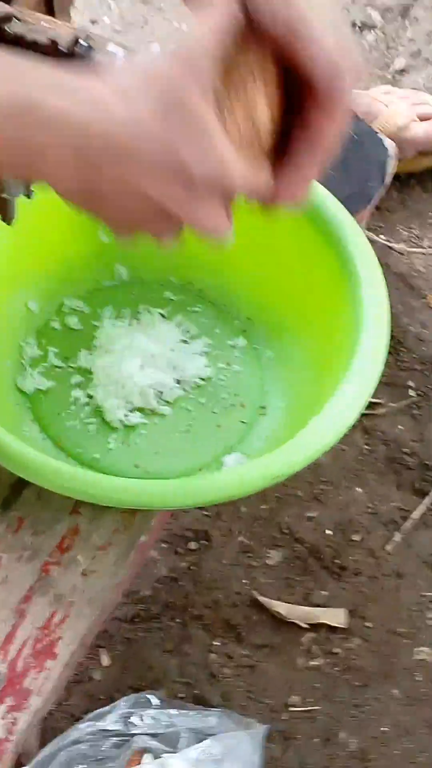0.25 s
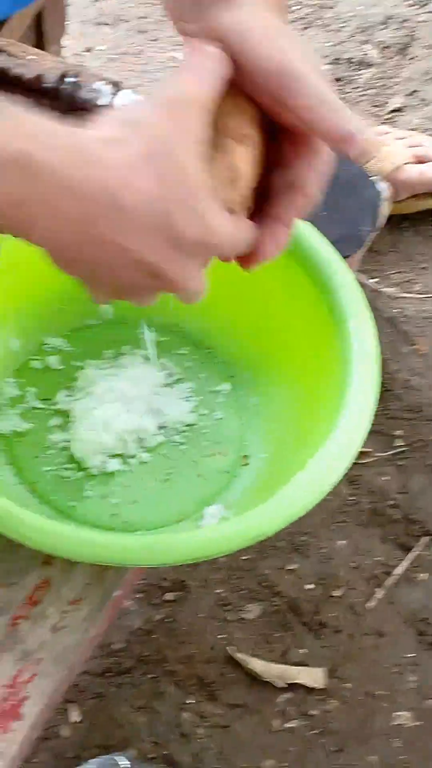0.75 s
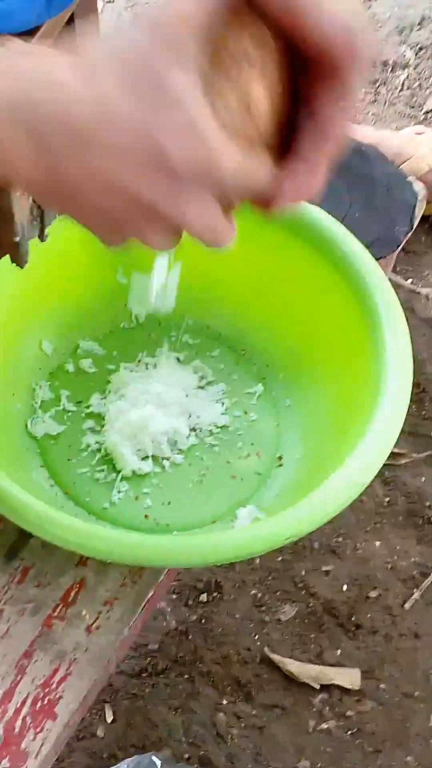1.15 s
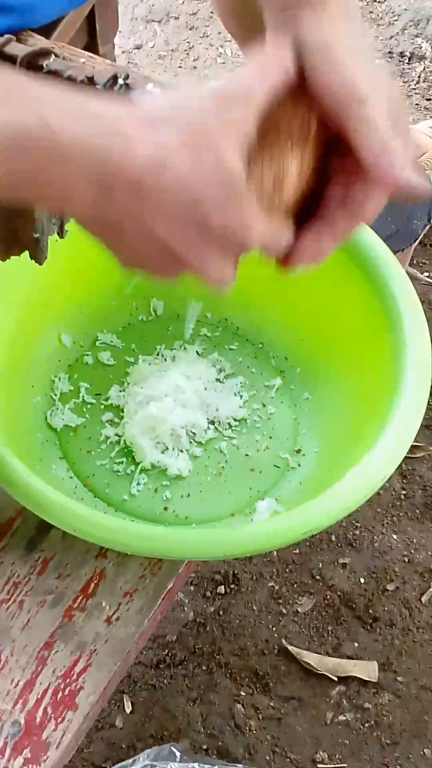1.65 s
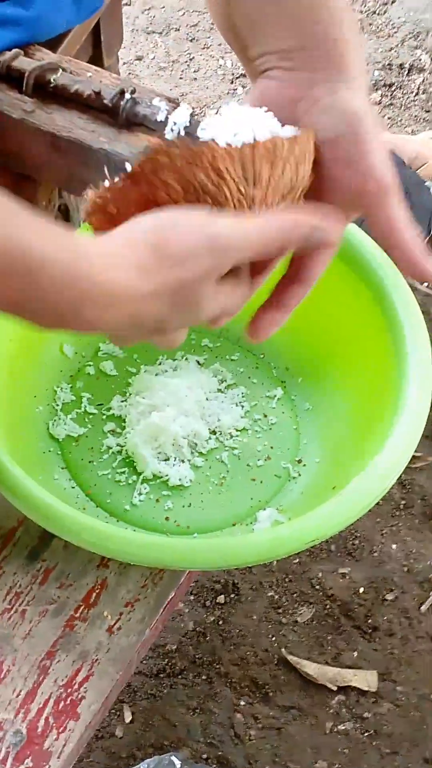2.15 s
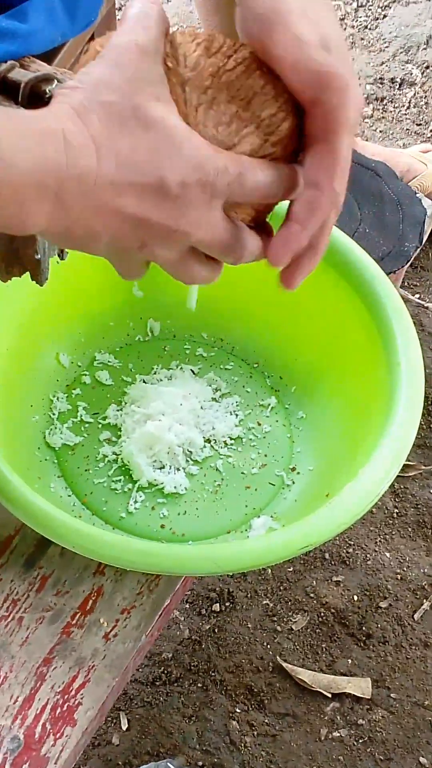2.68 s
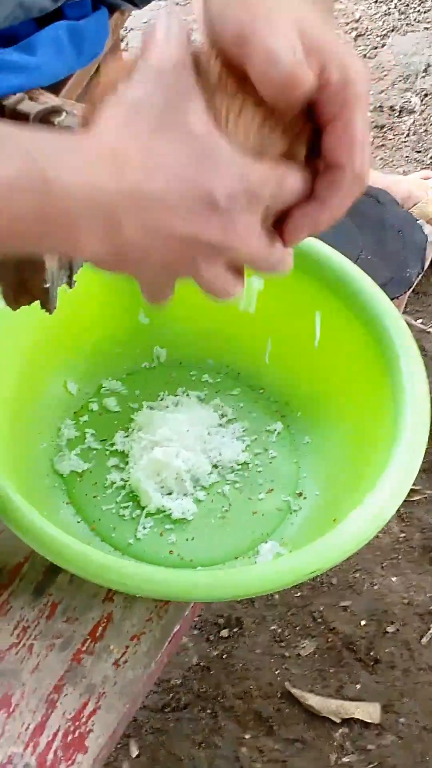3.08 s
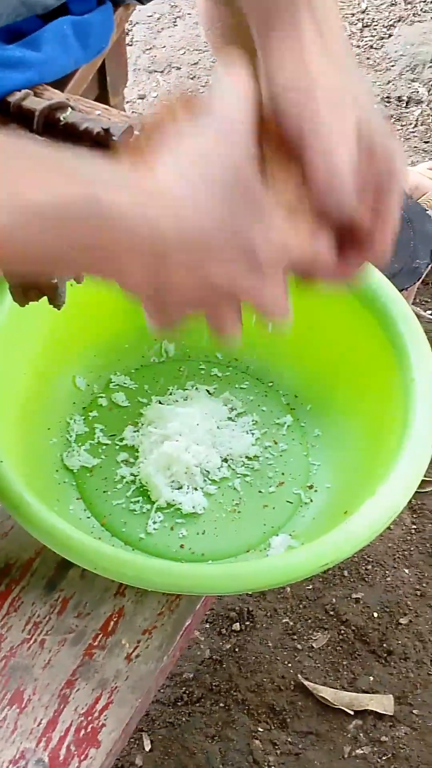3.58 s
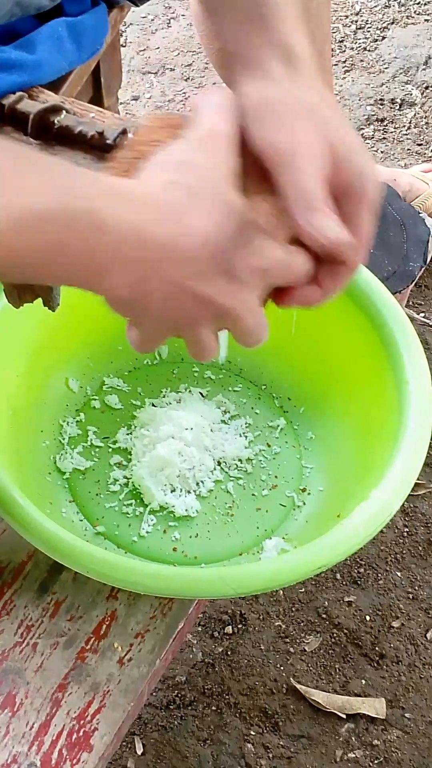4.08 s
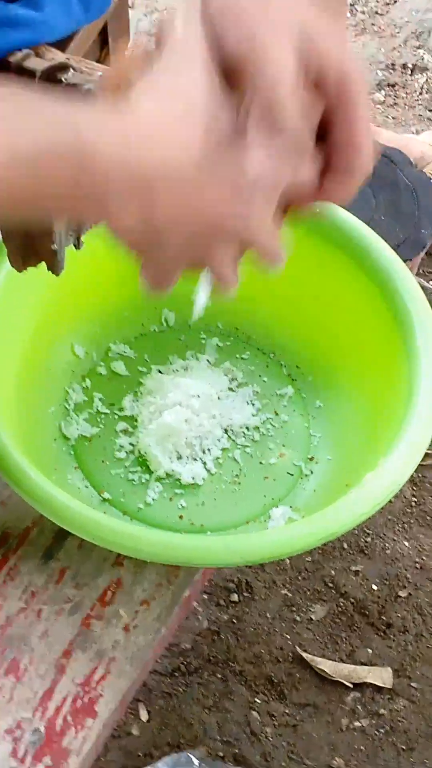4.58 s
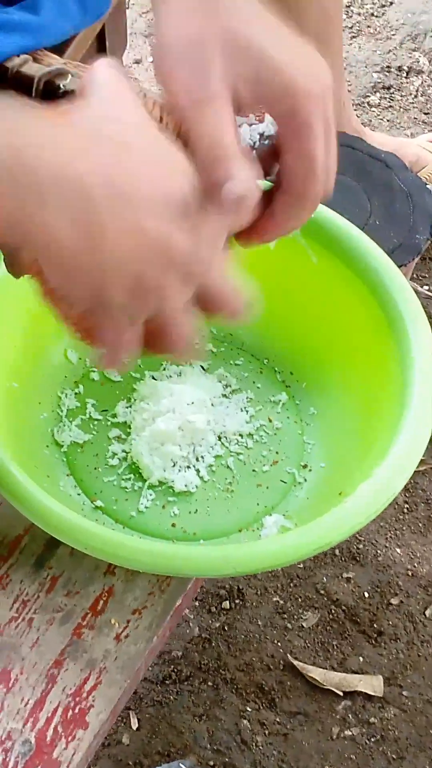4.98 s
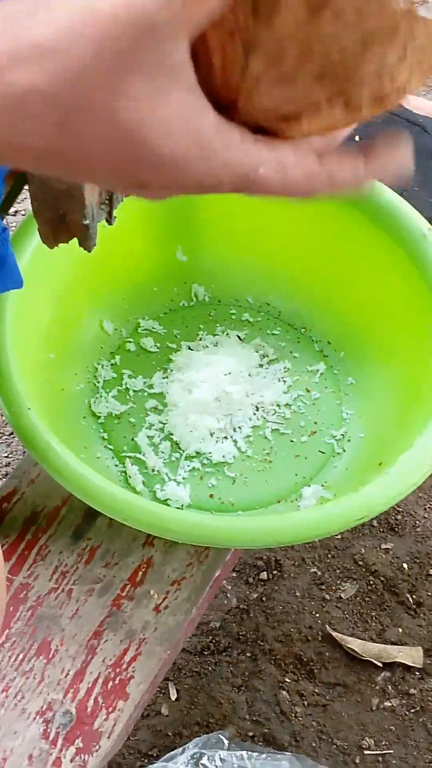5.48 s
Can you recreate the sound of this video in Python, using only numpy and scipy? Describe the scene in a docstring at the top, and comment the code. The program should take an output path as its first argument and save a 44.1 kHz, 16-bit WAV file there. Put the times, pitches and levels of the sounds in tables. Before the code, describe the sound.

From the start, half a coconut is grated by hand over a toothed steel blade, close by, at about three strokes a second. Each short pull is a gritty, tearing rasp with a hollow judder and knock of the shell and a soft thud from the wooden bench. Light crunches fall between strokes. The rim clacks lightly at 0.7 and 2.1 seconds, and small cracks come near 1.8, 2.4 and 5.2 seconds. Around 3 seconds the grating pauses, leaving a few faint ticks and one weak scrape. It resumes at 3.7 seconds, slightly less even, and runs until about 5.7 seconds, with a brief metallic ping at 5.5. Underneath are a faint rub of skin on husk and low, steady outdoor noise. Very faint, thin distant calls, perhaps poultry, come near 2.3, 3 and 4.4 seconds. The yard adds only a slight, short echo.

```python
"""Half a coconut is rasped by hand over a toothed blade in a quiet yard, about three strokes a second.
Over faint noise and rubbing, each pull tears fibres, judders the hollow shell and thuds the bench.
The teeth touch the meat between pulls and the shell knocks home; now and then the rim clacks or a tooth
bites with a crack. From 2.3 s come a few thin, far calls. Near 3 s the hand pauses to shift its grip,
then grates on, and a tooth pings in the last stroke. Nearby walls give the work a short tail."""
import sys
import numpy as np
from scipy import signal
from scipy.fft import rfft, irfft
from scipy.io import wavfile
from scipy.ndimage import uniform_filter1d

SR = 44100
rng = np.random.default_rng(int(sys.argv[2]) if len(sys.argv) > 2 else 0)


def put_to_file(sound):
    """Save the sound as 16-bit audio at rate SR, in the file named by the first command-line argument."""
    columns = np.atleast_2d(sound).T  # one column per channel
    safe = np.clip(columns, -1, 1)
    whole_steps = np.round(safe * 32767)
    wavfile.write(sys.argv[1], SR, whole_steps.astype(np.int16))


N = 253045

# spectrum of tearing meat: f/Hz, level/dB
TEAR_SPECTRUM = [(350, -27), (750, -17), (1030, -2), (1130, -4), (1400, -2), (1680, -5.5), (1950, 5),
                 (2400, 1), (3550, 2), (4150, -10.5), (6400, -8.5), (8600, -7.5), (10300, -8), (11800, -31),
                 (15800, -18.5)]
# ring of the steel teeth: f/Hz, width/Hz, level/dB
TEETH_MODES = [(4790, 190, 7), (8170, 1120, 15.5), (9000, 130, -6), (9630, 130, -2.5)]
# low modes of the shell in the hands: f/Hz, width/Hz, level/dB
SHELL_MODES = [(467.5, 11, -0.5), (575.3, 41, -8.5), (676, 43, -6.5), (718, 30, -13), (770, 12, -42),
               (977, 13.5, -8.5), (1185, 26, -3)]
# boards of the bench under the blade: f/Hz, width/Hz, level/dB
BOARD_MODES = [(167, 9, -5), (227, 37, 2), (259, 36, 5.5), (347, 17, 0)]
# legs of the bench on the ground: f/Hz, width/Hz, level/dB
LEG_MODES = [(101.5, 7.2, -26.5), (127.3, 77, -3.5)]


def from_db(db):
    """Decibels to gain."""
    return 10 ** (np.asarray(db) / 20)


def unit_rms(x):
    """Scale to unit power."""
    return x / np.sqrt(np.mean(x ** 2) + 1e-20)


def at_peak(x, db):
    """Scale to a peak level."""
    return from_db(db) * x / np.abs(x).max()


def steady(x, span_s):
    """Even out the slow swells of a random signal, keeping its fine grain."""
    power = uniform_filter1d(x ** 2, max(int(span_s * SR), 8))
    return x / np.sqrt(np.abs(power) + 1e-12)


def wander(size, per_s, spread_db):
    """A gain that glides between random levels."""
    knots = rng.standard_normal(256)
    return from_db(spread_db * np.interp(np.arange(size) * per_s / SR, np.arange(len(knots)), knots))


def add(track, start_s, sound):
    """Mix a sound in at a time."""
    at = max(int(start_s * SR), 0)
    track[at:at + len(sound)] += sound[:max(len(track) - at, 0)]


def band(x, low_hz, high_hz):
    """Keep the range between two frequencies."""
    return signal.sosfilt(signal.butter(2, [low_hz, high_hz], "band", fs=SR, output="sos"), x)


def soften(x, hz):
    """Low-pass: a contact cushioned by the meat carries little treble."""
    return signal.sosfilt(signal.butter(2, hz, fs=SR, output="sos"), x)


def resonate(x, modes):
    """Parallel resonators, one for each row of f/Hz, width/Hz, level/dB."""
    out = 0
    for hz, width, db in modes:
        radius = np.exp(-np.pi * width / SR)
        feedback = [1, -2 * radius * np.cos(2 * np.pi * hz / SR), radius ** 2]
        ring = signal.lfilter([1, 0, -1], feedback, x + 1e-18)
        out = out + from_db(db) * ring * (1 - radius ** 2) / 2
    return out


def colour(x, spectrum):
    """Minimum-phase filter with the given spectrum and unit power gain."""
    size = 4096
    hz, db = np.transpose(spectrum)
    bin_hz = np.arange(size // 2 + 1) * SR / size
    gain = from_db(np.interp(np.log(bin_hz + 1), np.log(hz), db))
    cepstrum = irfft(np.log(gain))
    cepstrum[1:size // 2] *= 2
    cepstrum[size // 2 + 1:] = 0
    response = irfft(np.exp(rfft(cepstrum)))
    return signal.fftconvolve(x, response / np.linalg.norm(response))[:len(x)]


def background_noise():
    """A quiet, steady bed of dark noise."""
    # colour of the background noise, with a deep dip near 670 Hz: f/Hz, level/dB
    noise_spectrum = [(15, -30), (25, -13.5), (96, -4.5), (133, -11), (157, -9), (241, -4.5), (342, -29.5),
                      (449, -10), (672, -52), (1060, -30.5), (3390, -31.5), (5230, -42), (8490, -23.5),
                      (15800, -63)]
    return from_db(-57) * colour(rng.standard_normal(N), noise_spectrum)


def hand_rub():
    """Soft skin on husk makes a faint, smooth swish that rests in the pause."""
    # envelope of the rubbing: t/s, level/dB
    rub_levels = [(0, -57), (1.0, -53), (2.4, -60.5), (2.93, -58.5), (3.05, -75), (3.3, -68), (3.6, -58),
                  (4.55, -59.5), (5.74, -61.5)]
    # colour of skin on husk: f/Hz, level/dB
    skin_spectrum = [(200, 8.5), (500, 9), (900, 4.5), (1600, -0.5), (3400, -3.5), (4500, -10),
                     (9000, -8.5), (13000, -22)]
    envelope = from_db(np.interp(np.arange(N) / SR, *np.transpose(rub_levels)))
    return envelope * colour(rng.standard_normal(N), skin_spectrum)


def pressure(t, bite_s, pull_s, release_db_per_s):
    """Force of a pull in dB: it swells as the teeth sink in, holds, then dies as the hand lets up."""
    depth_db = 13.5
    return -depth_db * np.maximum(1 - t / bite_s, 0) ** 2 - release_db_per_s * np.maximum(t - pull_s, 0)


def slips(size, per_s, jitter, spread_db):
    """Stick and slip: an uneven train of jolts."""
    gap, strength = rng.standard_normal((256, 2)).T
    at = (np.cumsum(np.exp(jitter * gap)) * SR / per_s).astype(int)
    train = np.zeros(size)
    train[at[at < size]] = from_db(spread_db * strength[at < size])
    return train


def fibres(size, per_s, spread_db):
    """Snapping fibres: random clicks of uneven strength."""
    strength = from_db(spread_db * np.minimum(rng.exponential(1, size), 4))
    snapped = rng.random(size) < per_s / SR
    return unit_rms(snapped * strength * rng.choice([-1, 1], size))


def cupped(x, reflect_db, count=6):
    """Hands, shell and bowl throw back short reflections, which differ with each stroke."""
    out = x.copy()
    for delay_s, polarity in zip(rng.uniform(.0006, .006, count), rng.choice([-1, 1], count)):
        add(out, delay_s, from_db(reflect_db) * polarity * x)
    return out


def tearing(snaps, wall_hz, wall_db, edge_db):
    """The rasp of torn meat: snapping fibres ring the shell wall, the steel and the shell's edge."""
    # bending modes of the shell wall: multiple of wall pitch, width/Hz, level/dB
    wall_ratios = [(1.004, 68, 17), (1.178, 129, 6.5), (1.53, 121, -25), (1.87, 222, -73)]
    # midrange rasp near the edge of the shell: f/Hz, width/Hz, level/dB
    edge_modes = [(1110, 53, -4.5), (1450, 900, -8.5)]
    size = len(snaps)
    wall_modes = [(ratio * wall_hz, width, db) for ratio, width, db in wall_ratios]
    # wall and teeth ring more or less as the point of contact travels
    wall = unit_rms(resonate(snaps, wall_modes)) * wander(size, per_s=40.3, spread_db=6.5)
    steel = unit_rms(resonate(snaps, TEETH_MODES)) * wander(size, per_s=85, spread_db=-1.5)
    edge = unit_rms(resonate(snaps, edge_modes))
    meat = colour(snaps, TEAR_SPECTRUM)
    rasp = meat + from_db(wall_db) * wall + from_db(-8.5) * steel + from_db(edge_db) * edge
    rasp = steady(cupped(rasp, reflect_db=-15), span_s=0.014)
    return rasp * wander(size, per_s=123, spread_db=2.54)  # the meat is now firm, now soft


def shell_judder(force, hollow_hz, hollow_db):
    """The pull shakes the shell and the air in its hollow, which rings narrowly over the blade."""
    cupped_width_hz = 39
    modes = SHELL_MODES + [(hollow_hz, cupped_width_hz, hollow_db)]
    return steady(resonate(band(force, low_hz=492, high_hz=894), modes), span_s=0.015)


def bench_thud(force, lean_db):
    """The cushioned pull drives the boards; leaning on the bench brings out its legs."""
    push = soften(force, hz=413)
    wood = resonate(push, BOARD_MODES) + from_db(lean_db) * resonate(push, LEG_MODES)
    return steady(wood, span_s=0.015)


def grating():
    """Pulls over the teeth: every slip jolts shell and bench and tears a bunch of fibres."""
    # one pull a row; the light one at 3.3 s is the shell being turned for a new grip:
    # t/s, bite/s, pull/s, release/(dB/s), tearing/dB, judder/dB, thud/dB,
    # hollow/Hz, hollow/dB, wall/Hz, wall/dB, edge rasp/dB, lean on the bench/dB
    strokes = [ (0.093, 0.073, 0.15, 288, -33.5, -31.5, -39, 495, -16, 1880, -7.5, 0.5, -25),
               (0.442, 0.03, 0.11, 306, -32.5, -29.5, -37.5, 550, -8, 1873, -10, 0.5, -24),
               (0.738, 0.024, 0.12, 334, -35, -32, -41, 416, 9, 1860, -18, -6.5, -15),
               (1.016, 0.054, 0.12, 333, -31, -29.5, -38.5, 514, -5, 1910, -3.5, -13, -5),
               (1.307, 0.035, 0.096, 325, -32.5, -26, -39, 535, 7.5, 1817, -2.5, -12, 7),
               (1.590, 0.036, 0.1, 293, -34.5, -29.5, -38.5, 508, 3, 1796, -6, -20, -1),
               (1.871, 0.019, .130, 362, -34.5, -31, -39.5, 502, 6.5, 1850, -3.5, -23, 7),
               (2.163, .041, 0.1, 290, -34, -27, -38.5, 524, 6.5, 1795, -4.5, -11, 5),
               (2.447, 0.017, 0.088, 309, -34, -24.5, -36, 515, 14, 1822, -2.5, -13, 6.5),
               (2.722, 0.049, 0.089, 300, -33.5, -27.5, -38, 519, 7, 1790, -5, -16, 5),
               (3.338, 0.029, 0.12, 120, -51.5, -51.5, -47.5, 505, 24, 1620, -19, -22, 2),
               (3.724, 0.084, 0.11, 314, -36.5, -32.5, -41.5, 516, 12, 1820, -9, -14, 2),
               (4.037, 0.072, .083, 270, -31.5, -27, -37, 500, 6, 1780, -11, -14, 7.5),
               (4.328, 0.032, 0.089, 228, -36, -31, -38, 522, 3.5, 1840, -15, -26, -2),
               (4.624, 0.013, 0.061, 205, -36, -26.5, -32.5, 530, 13, 1800, -4.5, -8, -2.5),
               (4.734, .012, 0.012, 309, -41, -32.5, -40.5, 546, -3, 1820, -6, -26, -10),
               (4.938, 0.043, 0.061, 226, -36, -27.5, -34, 505, 10, 1760, -4.5, -26, -3),
               (5.198, 0.037, 0.083, 278, -34, -27, -37.5, 526, 0.5, 1832, -5.5, -15, 2),
               (5.494, 0.029, 0.11, 271, -36.5, -29.5, -38, 535, 12, 1823, -10, -19, 3)]
    judder_follows, thud_follows = 1.107, 0.68  # dB per dB of pressure
    shove_s, settle_db_per_s = 0.028, 72  # the bench takes the first shove, then settles
    lead_s, catch_share, bunch_s = 0.02, 0.33, 0.0054
    out, t = np.zeros(N), np.arange(int(0.36 * SR)) / SR - lead_s
    for (start_s, bite_s, pull_s, release, tear_db, judder_db, thud_db,
         hollow_hz, hollow_db, wall_hz, wall_db, edge_db, lean_db) in strokes:
        contact = np.clip(1 + t / min(catch_share * bite_s, lead_s), 0, 1)  # the teeth take hold
        press_db = pressure(t, bite_s, pull_s, release)
        shove_db = thud_follows * pressure(t, shove_s, pull_s, release)
        shove_db -= settle_db_per_s * np.maximum(t - shove_s, 0)
        jolts = slips(len(t), per_s=260, jitter=0.7, spread_db=5)
        # fibres snap hardest just after a slip
        bunches = unit_rms(signal.lfilter([1], [1, -np.exp(-1 / (bunch_s * SR))], jolts))
        snaps = unit_rms(fibres(len(t), per_s=13000, spread_db=2.4) * (1 + 0.5 * bunches))
        force = unit_rms(jolts) + 0.76 * snaps
        rasp = from_db(tear_db + press_db) * tearing(snaps, wall_hz, wall_db, edge_db)
        judder = shell_judder(force, hollow_hz, hollow_db)
        judder *= from_db(judder_db + judder_follows * press_db)
        thud = from_db(thud_db + shove_db) * bench_thud(force, lean_db)
        add(out, start_s - lead_s, contact * (rasp + judder + thud))
    return out


def touches():
    """Between strokes the teeth crush a few fibres and nudge the bench."""
    # light contacts with the meat: t/s, relative level/dB, thud balance/dB
    contacts = [(0.4005, -39.5, 9.5), (0.6882, -31, 4), (0.972, -28.5, 1), (1.273, -33, 1),
                (1.552, -33, 9.5), (1.8368, -32, 2), (2.1183, -29, -1), (3.268, -50, 7.5),
                (3.617, -39, -22), (3.9866, -35, 1.5), (4.2976, -37, 1), (4.595, -29, 3.5),
                (5.1415, -33, 10), (5.1516, -28, -11), (5.1644, -34, 9), (5.457, -35.5, 4),
                (5.711, -39, -26)]
    out, t = np.zeros(N), np.arange(SR // 10) / SR
    press = (1 - np.exp(-t / 0.0013)) * np.exp(-t / 0.012)
    for start_s, db, thud_db in contacts:
        snaps = fibres(len(t), per_s=5000, spread_db=1)
        steel = from_db(-6) * unit_rms(resonate(snaps, TEETH_MODES))
        crunch = steady(colour(snaps, TEAR_SPECTRUM) + steel, span_s=0.0021)
        body = resonate(soften(snaps, hz=795), LEG_MODES + BOARD_MODES + SHELL_MODES[:2])
        thud = from_db(thud_db + 2.5) * steady(body, span_s=0.022)
        add(out, start_s, from_db(db - 9.5) * press * (crunch + thud))
    return out


def shell_knocks():
    """A knock ticks on the teeth and rings the shell; the air in its hollow swells a few cycles later."""
    # the shell lands on the blade, knocks home or jumps a ridge of meat: t/s, peak level/dB
    knocks = [(0.43, -33.5), (0.453, -28), (0.543, -21), (0.73, -30.5), (0.753, -30), (0.763, -19.5),
              (1.011, -28), (1.035, -23.5), (1.051, -20), (1.3, -27.5), (1.33, -25), (1.398, -28),
              (1.553, -44), (1.585, -25), (1.614, -13), (1.87, -28), (1.892, -14.5), (2.157, -29),
              (2.222, -18), (2.446, -21), (2.475, -19), (2.724, -26.5), (2.747, -21), (2.802, -16.5),
              (3.41, -40.5), (3.457, -33.5), (3.744, -23.5), (3.771, -13), (4.019, -27.5), (4.049, -16.5),
              (4.066, -15.5), (4.093, -17.5), (4.324, -28), (4.351, -18.5), (4.395, -18.5), (4.607, -30),
              (4.637, -27), (4.665, -15), (4.687, -15.5), (4.944, -20.5), (4.992, -18), (5.191, -26),
              (5.213, -16), (5.239, -14), (5.491, -19.5), (5.56, -15)]
    hollow_mode = [(526.2, 81, 0)]  # f/Hz, width/Hz, level/dB
    direct_db, tick_db = -10, -10
    tick_max_db = -34  # hard knocks sink into the meat and tick no louder
    out, t = np.zeros(N), np.arange(SR // 10) / SR
    for start_s, db in knocks:
        grit = rng.standard_normal(len(t))
        force = 0.082 * grit * np.exp(-t / 0.0079)
        force[0] += 1
        struck = resonate(band(force, low_hz=404, high_hz=880), SHELL_MODES + hollow_mode)
        ring = from_db(direct_db) * struck + resonate(struck, hollow_mode)
        tick = soften(colour(grit * np.exp(-t / 0.0051), TEAR_SPECTRUM), hz=3000)
        add(out, start_s, at_peak(ring, db) + at_peak(tick, min(db + tick_db, tick_max_db)))
    return out


def impacts(events, modes, contact_s, grit, low_hz, high_hz):
    """Short gritty hits, each ringing the same modes."""
    out, t = np.zeros(N), np.arange(SR // 10) / SR
    for start_s, db in events:
        force = grit * rng.standard_normal(len(t)) * np.exp(-t / contact_s)
        force[0] += 1
        ring = resonate(band(force, low_hz, high_hz), modes)
        add(out, start_s, at_peak(ring, db))
    return out


def rim_clacks():
    """The hard rim of the shell clacks against the steel."""
    # hits of the rim: t/s, peak level/dB
    clacks = [(0.693, -29.5), (2.119, -35)]
    # ring of the rim: f/Hz, width/Hz, level/dB
    rim_modes = [(1390, 105, 4), (1523, 25, 9)]
    return impacts(clacks, rim_modes, contact_s=0.00044, grit=0.08, low_hz=300, high_hz=2170)


def tooth_bites():
    """A tooth bites in and a tight cluster of fibres gives way with a crack."""
    # cracks: t/s, peak level/dB
    bites = [(1.8382, -24), (2.4435, -25), (3.0524, -48), (3.1215, -41.5), (3.5774, -58), (4.9492, -32),
             (5.1502, -23.5)]
    out, t = np.zeros(N), np.arange(SR // 30) / SR
    for start_s, db in bites:
        cluster = fibres(len(t), per_s=3900, spread_db=6) * np.exp(-t / 0.0062)
        crack = signal.lfilter([1, -0.7], [1], colour(cluster, TEAR_SPECTRUM))  # tilted bright
        add(out, start_s, at_peak(crack, db))
    return out


def far_calls():
    """Thin, far tones, perhaps poultry, that waver, swell and fade."""
    # calls: t/s, length/s, f/Hz, level/dB
    calls = [(2.335, 0.11, 895, -57), (2.95, .11, 850, -65), (4.43, 0.16, 1620, -56.5)]
    out = np.zeros(N)
    for start_s, length_s, hz, db in calls:
        size = int(length_s * SR)
        pitch_hz = hz * wander(size, per_s=40, spread_db=0.4)
        swell = np.sin(np.pi * np.arange(size) / size)
        add(out, start_s, from_db(db) * swell * np.sin(2 * np.pi * np.cumsum(pitch_hz) / SR))
    return out


def tooth_ping():
    """A steel tooth catches and pings."""
    # the catch: t/s, peak level/dB
    pings = [(5.5024, -19.5)]
    return impacts(pings, TEETH_MODES, contact_s=0.0011, grit=0.5, low_hz=3000, high_hz=11800)


def yard(x, t60_s, tail_db):
    """The walls around add a faint, thin tail."""
    t = np.arange(SR // 2) / SR
    envelope = from_db(-60 * t / t60_s) * (1 - np.exp(-t / 0.0011))
    tail = band(rng.standard_normal(len(t)) * envelope, low_hz=700, high_hz=7000)
    return x + from_db(tail_db) * signal.fftconvolve(x, tail / np.linalg.norm(tail))[:N]


def scene():
    """Strokes, touches and knocks in the yard, over faint rubbing, dark noise and far calls; mono."""
    accents = rim_clacks() + tooth_ping()
    bed = hand_rub() + background_noise()
    work = grating() + touches() + shell_knocks() + tooth_bites() + accents
    return (yard(work, t60_s=0.25, tail_db=-18) + bed + far_calls())[None]


def record(dry):
    """The loudest peaks are rounded and the top is cut steeply."""
    ceiling, cutoff_hz = 0.24, 15850
    rounded = ceiling * np.tanh(dry / ceiling)
    return signal.sosfilt(signal.ellip(10, 0.1, 80, cutoff_hz, fs=SR, output="sos"), rounded)


dry = scene()
out = record(dry)
put_to_file(out)
```